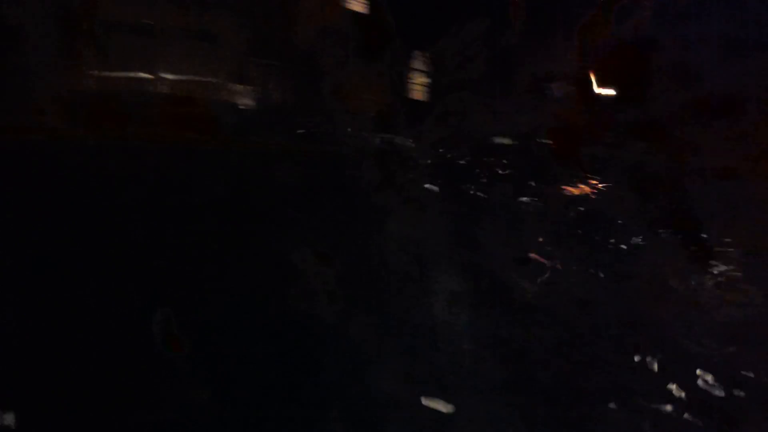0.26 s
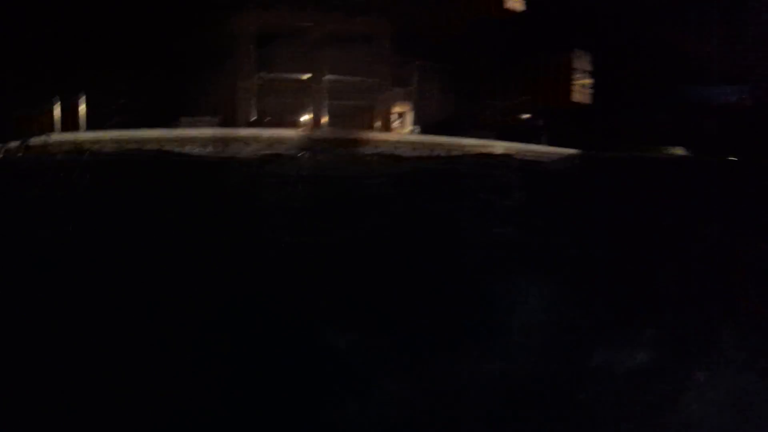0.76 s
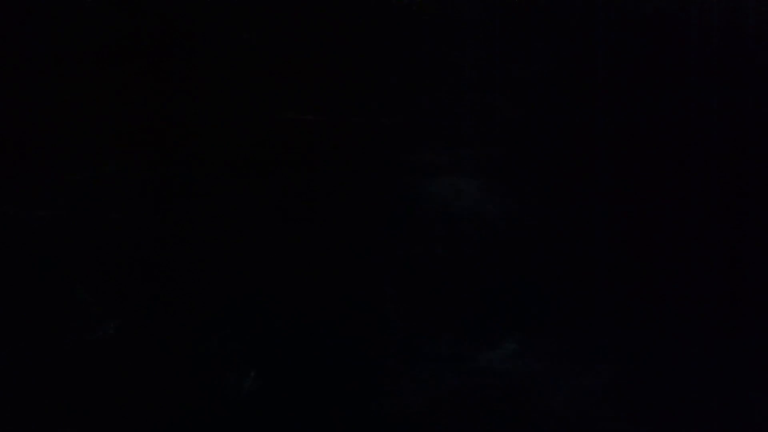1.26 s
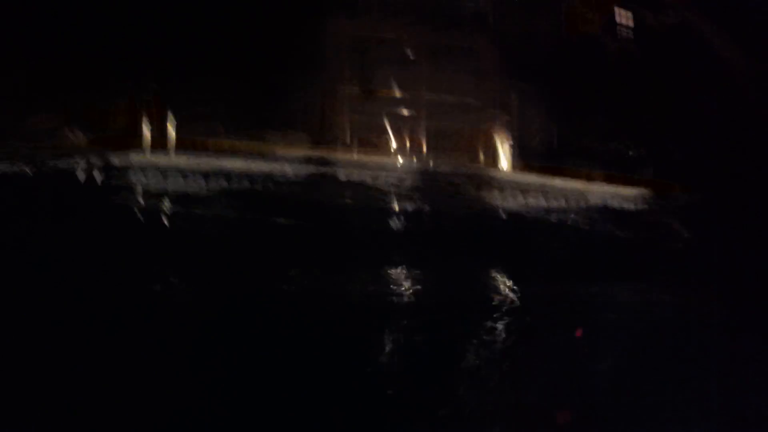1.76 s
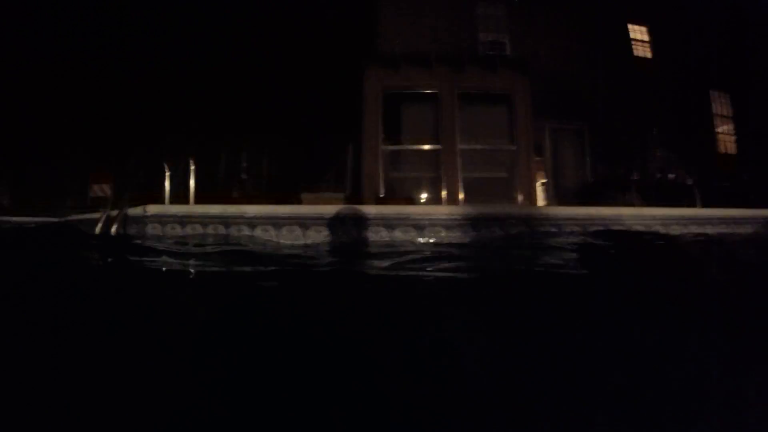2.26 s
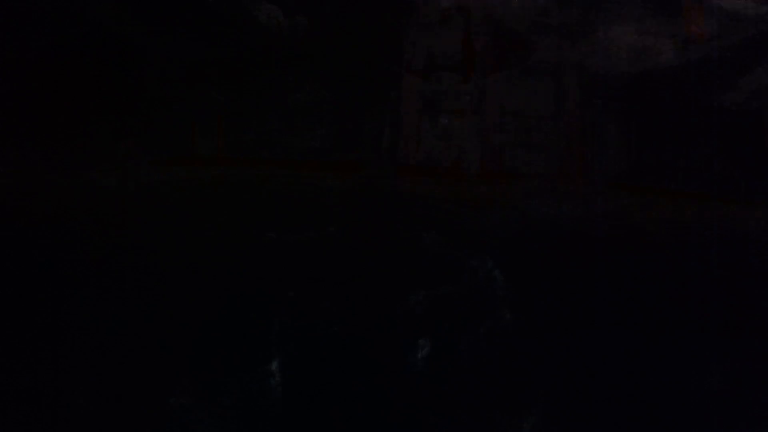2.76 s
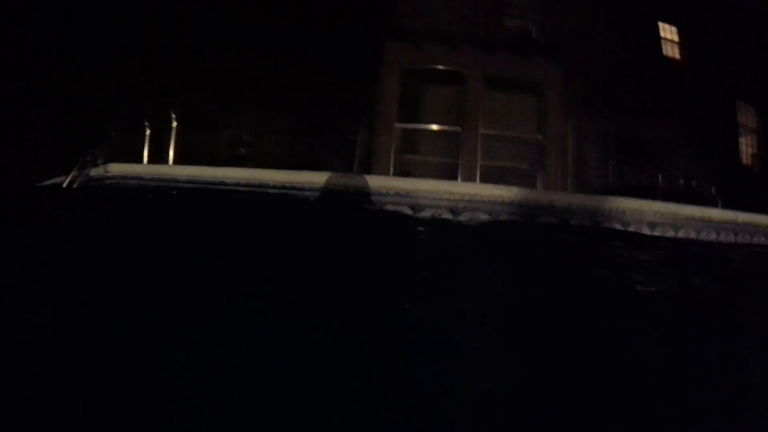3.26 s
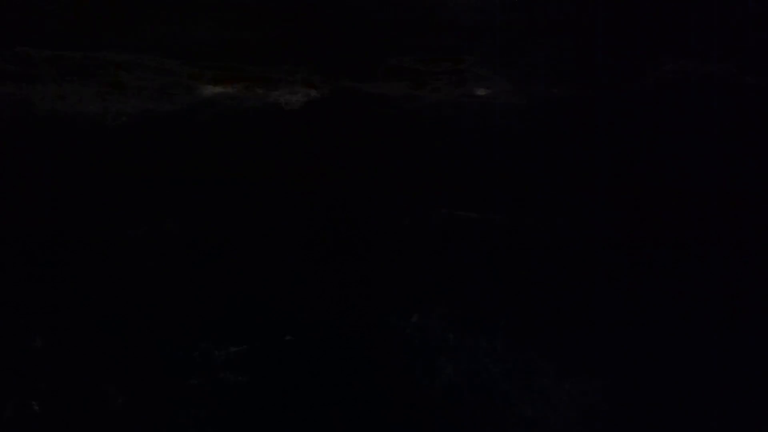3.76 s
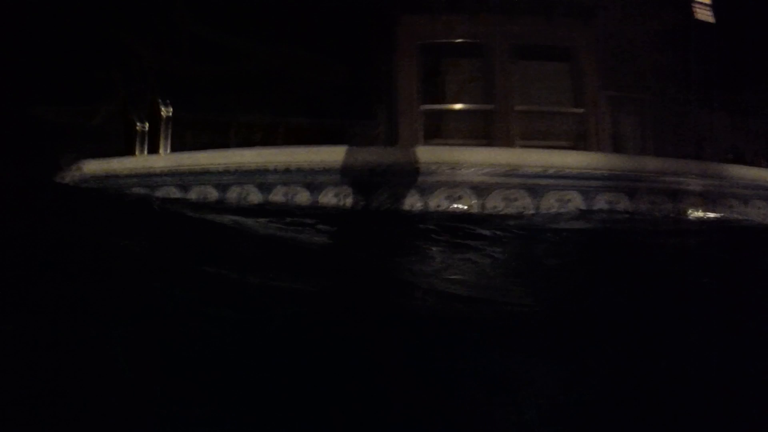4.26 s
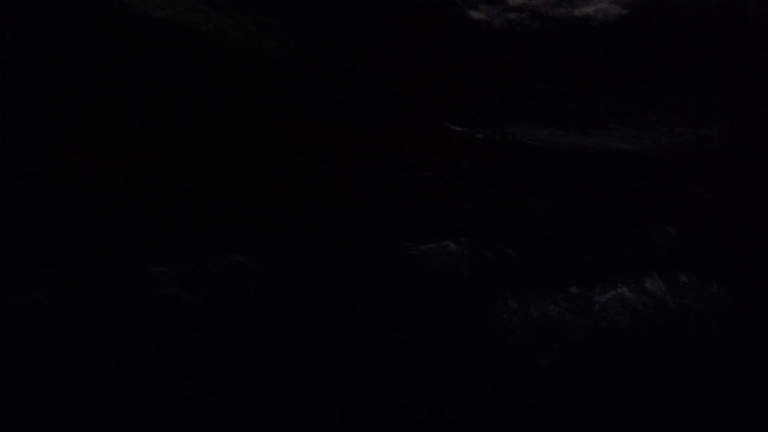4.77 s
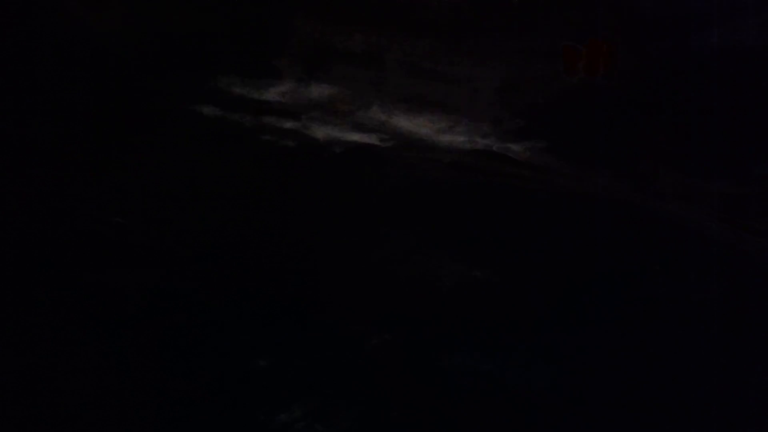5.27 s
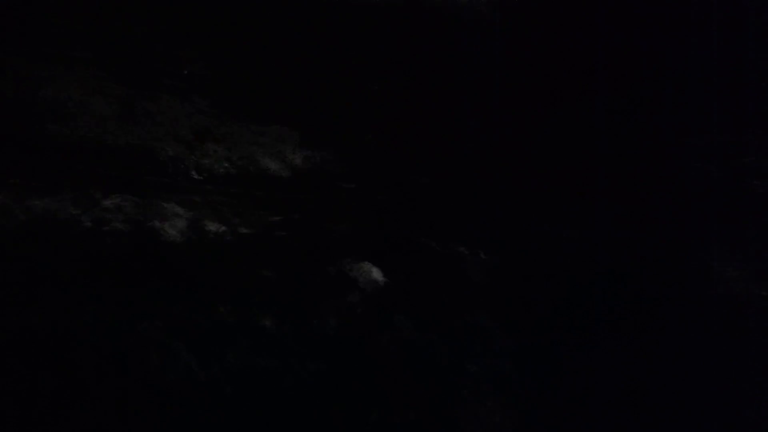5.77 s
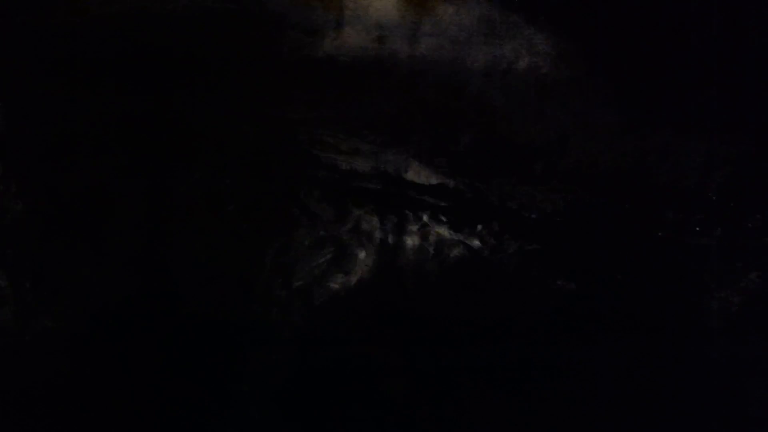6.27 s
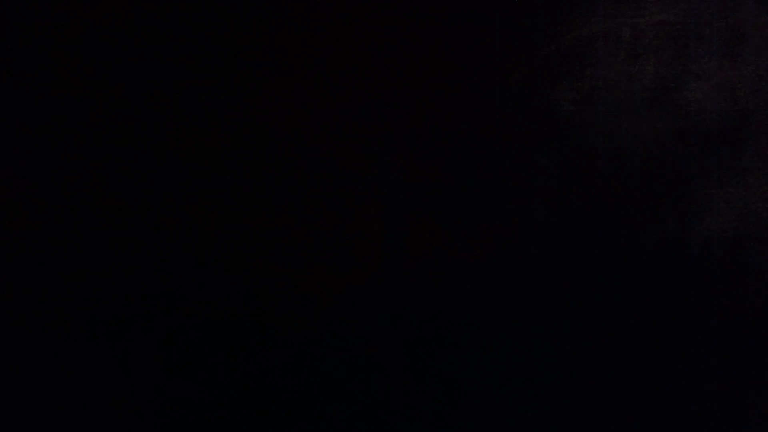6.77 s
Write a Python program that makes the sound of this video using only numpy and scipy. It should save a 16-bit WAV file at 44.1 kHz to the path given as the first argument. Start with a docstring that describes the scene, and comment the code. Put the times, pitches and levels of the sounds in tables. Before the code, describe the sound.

Small waves slop over a microphone at a pool's waterline, bubbling and dripping between uneven splashes.

```python
"""Waves slop over a waterproof camera at the waterline of a pool, at the foot of a waterslide at night.
Right at the microphone, drops slap the case, trapped air bubbles ring and foam fizzes between them.
A little way off, water runs on steadily; the surrounding water dulls when the camera dips under.
At the end a surge tumbles over it. Loud slaps push the camera's gain down, and it creeps back up."""
import sys
import numpy as np
from scipy import signal
from scipy.fft import rfft, irfft, next_fast_len
from scipy.io import wavfile
from scipy.ndimage import map_coordinates

SR = 44100
rng = np.random.default_rng(int(sys.argv[2]) if len(sys.argv) > 2 else 0)


def to_wav(s):
    """Save 16-bit WAV."""
    ch = np.atleast_2d(s).T  # columns
    pcm = np.round(np.clip(ch, -1, 1) * 32767)  # PCM
    wavfile.write(sys.argv[1], SR, pcm.astype(np.int16))


N = 309141
TOP_HZ = 16500  # the camera's band limit

# tone of sloshing water, of foam and of fine spray: frequency_hz, gain_db
SLOSH_SPECTRUM = [(150, -4.5), (560, -31.5), (780, 4.5), (1050, -1.5), (1280, 4.5), (1850, -7), (2300, -5),
                  (2850, -3), (3500, -6), (4400, -23.5), (7000, -22), (12000, -48)]
FIZZ_SPECTRUM = [(2000, -22.5), (4300, 1), (5200, -2.5), (6600, -0.5), (8300, -6.5), (10500, -14),
                 (12500, -13), (15500, -27.5)]
SPRAY_SPECTRUM = [(1500, -3.5), (4500, 0.5), (6500, 0.5), (8700, -1.5), (10500, -11), (14000, -18.5),
                  (16000, -29.5)]


def amp(db):
    """Decibels to gain."""
    return 10 ** (np.asarray(db) / 20)


def unit(x):
    """x at rms 1."""
    return x / np.sqrt(np.mean(x ** 2) + 1e-20)


def curve(points):
    """Straight lines through (time, value) points, one value a sample."""
    return np.interp(np.arange(N) / SR, *np.transpose(points))


def wobble(rate):
    """A smooth random curve, rate knots a second."""
    knots = rng.standard_normal(int(N * rate / SR) + 4)
    return map_coordinates(knots, [np.arange(N) * rate / SR])


def colour(x, spectrum):
    """x through a causal filter with the gain of the (Hz, dB) points."""
    size = 2 * next_fast_len(len(x))
    hz, db = np.transpose(spectrum)
    log_hz = np.log(np.fft.rfftfreq(size, 1 / SR) + 1)
    cepstrum = irfft(np.log(amp(np.interp(log_hz, np.log(hz), db))))
    cepstrum[1:size // 2] *= 2  # fold to minimum phase
    cepstrum[size // 2 + 1:] = 0
    return irfft(rfft(x, size) * np.exp(rfft(cepstrum)))[:len(x)]


def noise(spectrum):
    """Coloured noise at rms 1."""
    return unit(colour(rng.standard_normal(N), spectrum))


def mingle(grains, spectrum, share):
    """Noise and grains of one colour; the grains have the given share of the power."""
    return np.sqrt(1 - share) * noise(spectrum) + np.sqrt(share) * unit(colour(grains, spectrum))


def add(track, start_s, sound):
    """Mix a sound into the track."""
    part = track[max(0, round(start_s * SR)):][:len(sound)]
    part += sound[:len(part)]


def fade(t, t60):
    """A decay that loses 60 dB in t60 seconds."""
    return np.exp(-np.log(1000) * t / t60)


def lag(x, seconds):
    """x smoothed with this time constant."""
    keep = np.exp(-1 / (SR * seconds))
    return signal.lfilter([1 - keep], [1, -keep], x)


def bubble(t, hz, t60, rise, attack_s):
    """Trapped air rings; its pitch creeps up as it nears the surface."""
    phase = hz * (t + rise * (t * t / t60 - t / 2))
    return np.sin(2 * np.pi * phase) * fade(t, t60) * (1 - np.exp(-t / attack_s))


def swarm(per_second, centre_hz, spread, cycles, scatter_db, ring_samples=800):
    """Many small bubbles of random pitch and strength, at rms 1."""
    count = int(per_second * N / SR)
    when, luck, radius, angle = rng.random((count, 4)).T
    normal = np.sqrt(-2 * np.log(1 - radius)) * np.cos(2 * np.pi * angle)
    hz = np.clip(centre_hz * np.exp(spread * normal), 700, 15000)[:, None]
    strength = amp(scatter_db * np.minimum(-np.log(1 - luck), 4))[:, None]
    t = np.arange(ring_samples) / SR
    rings = strength * bubble(t, hz, cycles / hz, rise=0.038, attack_s=0.5 / hz)
    places = (when * N).astype(int)[:, None] + np.arange(ring_samples)
    return unit(np.bincount(places.ravel(), rings.ravel(), N)[:N])


def splatter(t, spectrum, centre_hz, t60, stagger_s, hiss_db, count=5):
    """A few tiny bubbles born one after another in a puff of noise, with the energy of 2 ms at rms 1."""
    puff = amp(hiss_db) * rng.standard_normal(len(t)) * fade(t, t60) * (1 - np.exp(-t / 0.00063))
    for pitch, delay in zip(rng.standard_normal(count), stagger_s * rng.random(count) ** 2):
        hz = min(centre_hz * np.exp(0.4 * pitch), TOP_HZ)
        age = np.maximum(t - delay, 0)
        puff += fade(delay, 2 * t60) * bubble(age, hz, t60, rise=0.012, attack_s=0.0004)
    puff = colour(puff, spectrum)
    return puff * np.sqrt(0.002 * SR / np.sum(puff ** 2))


def running_water():
    """Water runs on steadily a little way off, with a hollow ring."""
    # hollow resonances: pitch_hz, width_hz, gain_db
    resonances = [(727, 65, 1.5), (1350, 73, -0.5), (2260, 110, 6), (2840, 62, -6.5), (3540, 55, -5),
                  (4390, 110, -9.5)]
    f = np.fft.rfftfreq(N, 1 / SR)
    response = sum((-1) ** k * amp(db) * 1j * f * width / (hz * hz - f * f + 1j * f * width)
                   for k, (hz, width, db) in enumerate(resonances))
    hollow = unit(irfft(rfft(rng.standard_normal(N)) * response, N))
    rush, fizz = noise(SLOSH_SPECTRUM), noise(FIZZ_SPECTRUM)
    return (amp(-65 + 0.8 * wobble(30)) * rush
            + amp(-71 + 0.75 * wobble(27)) * fizz
            + amp(-73.5 + 0.58 * wobble(13)) * hollow)


def buffeting():
    """Moving water pushes on the case in low lumps."""
    # strength of the push: time_s, level_db
    push_levels = [(0, -55.5), (2.1, -60.5), (2.7, -58), (2.8, -46), (2.9, -59.5), (5.3, -55),
                   (5.57, -31.5), (5.65, -60.5), (6.73, -54), (6.79, -28.5), (6.87, -41.5), (7.01, -34.5)]
    # its rumble: frequency_hz, gain_db
    rumble_spectrum = [(20, 1.5), (60, -3.5), (180, -4.5), (320, -12), (700, -14.5), (2500, -59)]
    return amp(curve(push_levels) + 1.3 * wobble(25)) * noise(rumble_spectrum)


def wave_levels():
    """Slosh and fizz in dB: each wave swells and ebbs at a steady rate, and overlapping waves add up."""
    # waves over the case: crest_s, swell_s, ebb_s, slosh_db, fizz_db; swell and ebb each span 20 dB
    waves = [(0.03, .1, 0.029, -46.5, -64), (0.15, 0.13, 0.067, -68, -61.5),
             (0.299, 0.044, 0.066, -34.5, -59), (0.52, 0.052, 0.062, -37, -61.5),
             (0.818, 0.25, 0.11, -45.5, -67), (1.21, 0.17, .06, -37.5, -64), (1.619, 0.14, 0.21, -33, -53),
             (1.889, 0.041, 0.075, -18, -32), (2.349, 0.34, 0.86, -52.5, -70.5),
             (2.8, 0.046, 0.055, -20.5, -44.5), (3, 0.23, 0.2, -50.5, -84),
             (3.93, 0.04, 0.059, -41.5, -48.5), (4.68, 0.16, 0.12, -40, -53.5), (5.491, .24, .12, -28, -45),
             (6.2, 0.12, 0.32, -58, -87), (6.92, 0.1, 0.25, -12.5, -36.5)]
    t, power = np.arange(N) / SR, np.full((2, N), 1e-12)
    for crest, swell, ebb, slosh_db, fizz_db in waves:
        shape_db = -20 * np.maximum((crest - t) / swell, (t - crest) / ebb)
        power += amp([[slosh_db], [fizz_db]]) ** 2 * amp(np.maximum(shape_db, -100)) ** 2
    return 10 * np.log10(power)


def wash():
    """Water churns around the microphone, bubbles below and foam above; the harder, the grainier."""
    slosh_db, fizz_db = wave_levels()
    churn = np.clip((fizz_db + 71) / 10, 0, 1)
    bubbles = swarm(per_second=230, centre_hz=1900, spread=0.5, cycles=28, scatter_db=3.5)
    foam = swarm(per_second=260, centre_hz=5500, spread=0.45, cycles=5, scatter_db=4)
    slosh = mingle(bubbles, SLOSH_SPECTRUM, share=0.12 + 0.65 * churn)
    fizz = mingle(foam, FIZZ_SPECTRUM, share=0.15 + 0.72 * churn)
    return amp(slosh_db - 8 + 3.6 * wobble(47)) * slosh + amp(fizz_db + 1 + 1.4 * wobble(60)) * fizz


def muffle(water):
    """With the microphone under, the surrounding water drops in level, and the treble most."""
    # dips of the camera: start_s, end_s, loss_db (below the treble; negative is a lift)
    dunks = [(1.277, 1.436, 7), (2.05, 2.29, 4.5), (5.6, 5.85, -0.5)]
    edge_s, treble_loss_ratio = 0.07, 2.7
    t = np.arange(N) / SR
    loss_db = sum(db * np.clip(np.minimum(t - start, end - t) / edge_s, 0, 1)
                  for start, end, db in dunks)
    treble = signal.sosfiltfilt(signal.butter(2, 3500, "high", fs=SR, output="sos"), water)
    return amp(-loss_db) * (water - treble) + amp(-treble_loss_ratio * loss_db) * treble


def trickle():
    """Between waves, water runs off the case in a soft patter of small bubbles."""
    # strength of the run-off: time_s, level_db
    runoff_levels = [(0, -52.5), (.88, -59), (1.3, -72), (2.2, -70.5), (2.5, -59), (3.4, -70), (5.5, -63),
                     (6.3, -62.5), (6.5, -73)]
    patter = swarm(per_second=130, centre_hz=1700, spread=0.5, cycles=26, scatter_db=2.2,
                   ring_samples=1600)
    return amp(curve(runoff_levels)) * patter


def glugs():
    """Larger air pockets swell softly, glide in pitch near the surface and quiver as they deform."""
    # air pockets: start_s, length_s, start_hz, end_hz, level_db
    pockets = [(0.021, 0.045, 1091, 1240, -42.5), (1.434, .06, 174, 230, -43),
               (1.478, .03, 594, 900, -34.5), (1.964, 0.044, 523, 575, -32),
               (1.983, 0.057, 716, 763, -31.5), (2.952, 0.048, 687, 814, -36.5), (3, 0.039, 863, 1004, -35),
               (3.186, 0.043, 817, 1514, -23.5), (3.62, 0.026, 1170, 3030, -26.5),
               (4.049, 0.045, 1410, 1420, -50.5), (5.54, 0.0098, 740, 855, -5.5),
               (5.642, 0.045, 768, 806, -42), (5.965, 0.039, 1490, 1350, -44.5),
               (6.769, 0.093, 204, 147, -24.5), (6.924, 0.079, 210, 220, -33)]
    out = np.zeros(N)
    for start_s, length_s, start_hz, end_hz, db in pockets:
        progress = np.linspace(0, 1, int(length_s * SR))
        hz = start_hz + (end_hz - start_hz) * progress ** 2
        swell = progress * np.exp(-4.5 * progress) * np.sqrt(1 - progress)
        add(out, start_s, amp(db) * swell / swell.max() * np.sin(2 * np.pi * np.cumsum(hz) / SR))
    return out * amp(4 * wobble(220))


def ticks():
    """Stray specks of fine spray tick on the case."""
    # specks: start_s, level_db
    specks = [(0.274, -32.5), (0.312, -30), (.357, -40.5), (0.373, -35), (0.532, -27.5), (1.14, -30),
              (1.196, -16), (1.278, -38.5), (2.006, -32.5), (2.043, -32), (2.593, -44.5), (2.76, -30.5),
              (3.651, -33.5), (3.737, -28.5), (3.78, -29.5), (3.788, -27.5), (3.941, -39), (4.37, -35),
              (4.397, -47), (5.619, -36.5)]
    out, t = np.zeros(N), np.arange(SR // 20) / SR
    for start_s, db in specks:
        tick = splatter(t, SPRAY_SPECTRUM, centre_hz=4770, t60=0.01, stagger_s=0.003, hiss_db=6)
        add(out, start_s, amp(db) * tick)
    return out


def thumps():
    """A whole sheet of water gives the case one short push and rebound."""
    # jolts: start_s, relative_db
    jolts = [(1.111, -29.5), (1.244, -16), (1.881, -34.5), (1.923, -23.5), (4.774, -27), (5.558, -22.5),
             (6.876, -19.5)]
    out, t = np.zeros(N), np.arange(SR // 20) / SR
    age = t / 0.00065  # in time constants
    pulse = 2 * age * (2 - age) * np.exp(-age)
    for start_s, db in jolts:
        add(out, start_s, amp(db + 4.5) * pulse)
    return out


def gurgle():
    """Every wave folds in longer-ringing bubbles, and flings droplets at the case."""
    slosh_db, fizz_db = wave_levels()
    bubbles = swarm(per_second=260, centre_hz=2003, spread=0.5, cycles=60, scatter_db=3,
                    ring_samples=2400)
    droplets = swarm(per_second=37, centre_hz=4200, spread=0.73, cycles=25, scatter_db=1.5)
    return amp(slosh_db - 8) * bubbles + amp(fizz_db + 6.5) * droplets


def drops():
    """Right at the microphone, each drop slaps the case, throws spray and leaves a ringing bubble."""
    # the clearest drops and bursting bubbles: start_s, pitch_hz, ring_db, slap_db, spray_db
    # (levels are relative within each column)
    impacts = [(0.2206, 1543, -16.0, -31.0, -60), (0.2836, 2910, -6.5, -17, -18),
               (0.295, 2120.0, -16.5, -15.5, -44.5), (0.302, 1220.0, -10.5, -13.5, -26.5),
               (0.396, 2300, -25.0, -25.5, -47.5), (0.434, 2790.0, -15.0, -26, -54.0),
               (0.4837, 4100.0, -8.5, -26, -38), (0.5306, 1385, -0.5, -9, -49),
               (0.5813, 2880, -9, -32, -41), (0.5995, 2750, -17.5, -31, -36),
               (0.6631, 2220, -17, -25.5, -62.0), (0.858, 3900.0, -31.5, -35, -67),
               (1.026, 5590.0, -17.5, -30.5, -33), (1.042, 3200.0, -16.5, -38, -44.5),
               (1.0598, 4080.0, 5, -16, -21), (1.0733, 4970.0, -4.5, -25.5, -13.5),
               (1.109, 1654, 1.5, 0.5, -17), (1.1587, 3440, -3, -9.5, -23.5),
               (1.181, 3260.0, -3.5, -13.5, -40.5), (1.198, 919, -3.5, -38, -26.5),
               (1.2199, 1877, -5.5, -30.5, -33.5), (1.2443, 1923, 4, 1.5, -21),
               (1.351, 590.0, -34, -64, -64.0), (1.49, 850.0, -20.5, -35.5, -44.5),
               (1.553, 854, -22.5, -17.5, -35), (1.5791, 3280, -15.0, -16.5, -25.5),
               (1.5883, 1177, -11, -28, -39), (1.6237, 1003.0, -23, -26.5, -24.5),
               (1.6574, 1160.0, -25, -30, -33.0), (1.6726, 3660, -12.0, -28, -28.5),
               (1.812, 4130.0, -12.5, -31.5, -29), (1.8553, 3610.0, -6.0, -17.5, -23),
               (1.8773, 2394, -4.5, -18, -7.5), (1.9039, 1281, -7, -7.5, -23.5),
               (1.92, 2738, 2.5, -11, -35), (1.943, 4760, -13, -12.5, -19.5),
               (1.9694, 734, -16, -24, -34.0), (2.02, 1030, -23.5, -26, -59),
               (2.0822, 2480.0, -29, -37, -63), (2.52, 2800.0, -30.5, -43.5, -70.0),
               (2.784, 4240.0, 0.5, -8.5, -5), (2.7912, 3428, -0.5, -15.5, -7),
               (2.807, 1500, -9.5, -16.5, -23), (2.839, 1400, -12, -11.5, -38),
               (2.8702, 3780, -5.5, -24.5, -33.5), (2.9453, 740.0, -22, -27, -57.5),
               (2.9674, 9690.0, 3.5, -19, -13.5), (3.1863, 1000, -21, -16, -55),
               (3.5524, 6560, -9.5, -16.5, -8), (3.567, 2315, 2, -8.5, -27),
               (3.5957, 1587, -2.5, 1.5, -37.5), (3.6961, 3770, -12.5, -31.5, -39),
               (3.7235, 1296, -16.5, -10.5, -25), (3.7513, 2590, -12.5, -33.0, -47),
               (3.792, 930, -25.0, -22, -20.5), (3.9806, 3640, -21, -68, -39.5),
               (4.547, 1150.0, -15.5, -20, -16), (4.5985, 5920, 3.5, -25.5, -22.5),
               (4.669, 950.0, -13.5, -17.5, -52.0), (4.6824, 3205, 1.5, -14.5, -36),
               (4.7211, 1577, -16.5, -12, -32.5), (4.7297, 5492, 4.5, -21, -14.5),
               (4.7578, 7650, 5, -22.5, -22.5), (4.774, 7560, 3, -7.5, -3),
               (4.7803, 4190.0, -0.5, -18.5, -14), (4.914, 1540.0, -25, -33, -44),
               (4.9346, 1520.0, -29.0, -38.0, -63.0), (5.3378, 1780, -24, -19.5, -48.0),
               (5.3956, 5470, -9.5, -29.0, -33.5), (5.42, 1310.0, -9, -16, -29),
               (5.4327, 1110.0, -12.5, -9.5, -23.5), (5.4649, 3960.0, -11.0, -30.5, -46),
               (5.4722, 4760, -7.5, -20, -20), (5.4904, 2570.0, -7, -21.5, -33),
               (5.5139, 1823, -13, -9.0, -21.0), (5.522, 6600.0, -7.5, -23.5, -25),
               (5.5424, 1540, 1.5, -5, -34.5), (5.5464, 3738, 2, -12, -35),
               (5.5772, 4400.0, -12.5, -17, -41.5), (5.5865, 1119, 3.5, -2.5, -14.5),
               (5.887, 1860, -26.5, -33.5, -78), (5.9907, 683, -32.5, -62, -72), (6.86, 3007, -1, -30, -29),
               (6.8758, 905, -4.5, -1.5, -14.5), (6.9055, 977, -4.5, -36, -36),
               (6.9161, 2600, -2.5, -10, -20.5), (6.9464, 1290.0, -29, -1.5, -30),
               (6.967, 2210.0, -8, -29, -22.0)]
    # tone of water hitting the case: frequency_hz, gain_db
    slap_spectrum = [(30, -18.5), (200, -11), (580, -24.5), (850, 2.5), (1500, 1.5), (3800, -0.5),
                     (5500, -21), (12000, -46.5)]
    case_cutoff_hz = 8500
    out, t = np.zeros(N), np.arange(SR // 10) / SR
    for start_s, hz, ring_db, slap_db, spray_db in impacts:
        t60 = 0.022 * (1620 / hz) ** 0.99  # smaller bubbles die sooner
        ring = bubble(t, hz, t60, rise=0.0087, attack_s=0.00029)
        ring /= np.hypot(1, (hz / case_cutoff_hz) ** 4)
        slap = splatter(t, slap_spectrum, centre_hz=1780, t60=0.02, stagger_s=0.0021, hiss_db=1)
        spray = splatter(t, SPRAY_SPECTRUM, centre_hz=6690, t60=0.0075, stagger_s=0.0066, hiss_db=-5)
        add(out, start_s, amp(ring_db) * ring + amp(slap_db - 4) * slap + amp(spray_db - 1.5) * spray)
        # a film of water arrives just ahead, heard on the big drops
        film = splatter(t, SPRAY_SPECTRUM, centre_hz=3800, t60=0.01, stagger_s=0.004, hiss_db=0)
        add(out, start_s - 0.005, amp(3.4 * ring_db - 37.5) * film)
        # what the slap throws up falls back a moment later
        backsplash = splatter(t, slap_spectrum, centre_hz=2800, t60=0.009, stagger_s=0.01, hiss_db=-3)
        add(out, start_s + rng.uniform(0.004, 0.014), amp(slap_db - 17) * backsplash)
    return out


def case_ring(splashes, t60, wet_db):
    """The case and the water around it ring on briefly after every blow."""
    t = np.arange(SR // 4) / SR
    envelope = fade(t, t60) * (1 - np.exp(-t / 0.001))
    tail = colour(rng.standard_normal(len(t)) * envelope, SLOSH_SPECTRUM)
    return amp(wet_db) * signal.fftconvolve(splashes, tail / np.linalg.norm(tail))[:N]


def gain_control(x, threshold_db, slope, smoothing_s, release_db_per_s):
    """Loud slaps push the gain down, and it creeps back up."""
    level_db = 10 * np.log10(lag(x ** 2, 0.004) + 1e-12)
    wanted_cut_db = slope * np.maximum(level_db - threshold_db, 0)
    recovery_db = release_db_per_s * np.arange(N) / SR
    cut_db = np.maximum.accumulate(wanted_cut_db + recovery_db, axis=-1) - recovery_db
    return x * amp(-lag(cut_db, smoothing_s))


def scene():
    """Close splashes over the churning pool, in mono from the waterline."""
    splashes = drops() + ticks() + glugs() + thumps() + trickle() + gurgle()
    water = muffle(wash() + running_water() + buffeting())
    return (splashes + case_ring(splashes, t60=0.076, wet_db=-28.5) + water)[None]


def record(dry):
    """The camera rides its gain, rounds off peaks near full scale and cuts above its band limit."""
    ridden = gain_control(dry, threshold_db=-22.5, slope=0.41, smoothing_s=0.036, release_db_per_s=26.5)
    rounded = ridden / (1 + np.abs(ridden) ** 6) ** (1 / 6)
    size = next_fast_len(N + SR // 2)
    passband = np.clip((TOP_HZ - np.fft.rfftfreq(size, 1 / SR)) / 700, 0, 1) ** 2
    return irfft(rfft(rounded, size) * passband, size)[:, :N]


dry = scene()
out = record(dry)
to_wav(out)
```